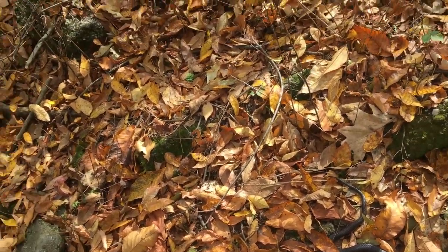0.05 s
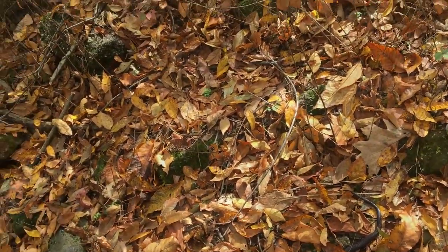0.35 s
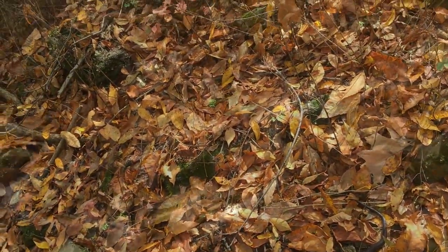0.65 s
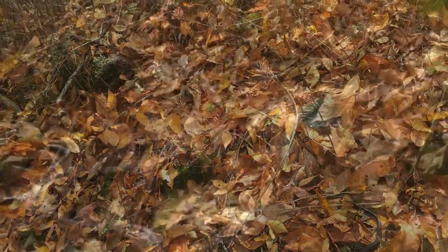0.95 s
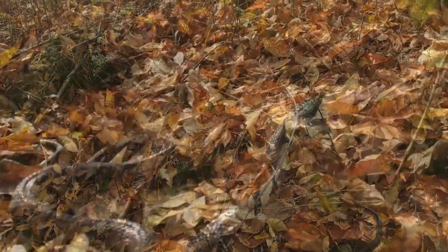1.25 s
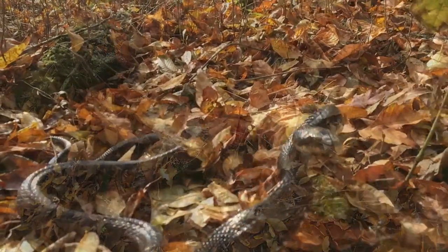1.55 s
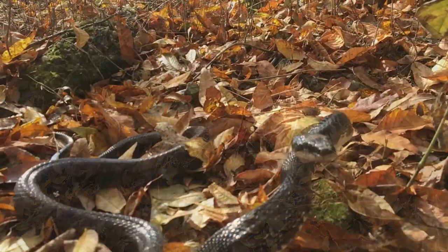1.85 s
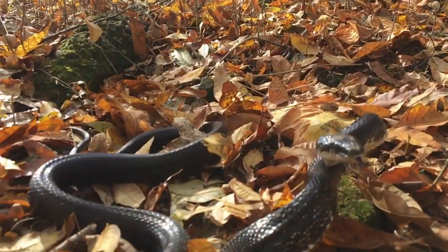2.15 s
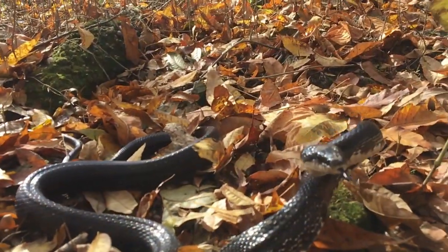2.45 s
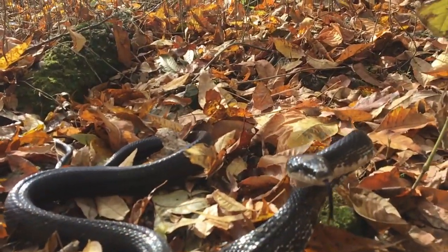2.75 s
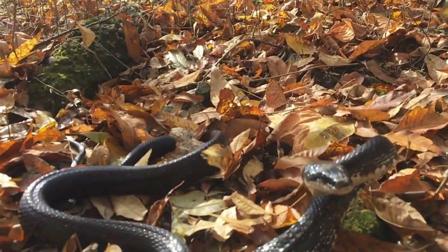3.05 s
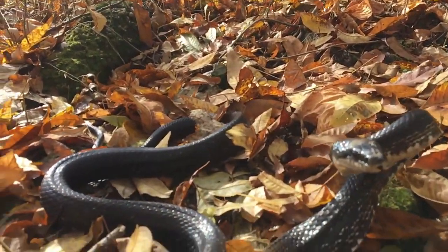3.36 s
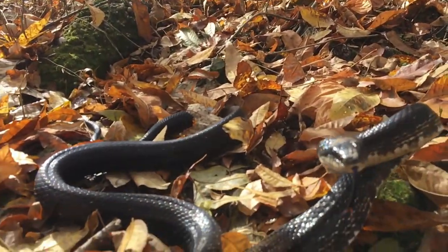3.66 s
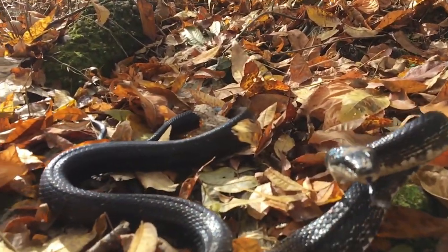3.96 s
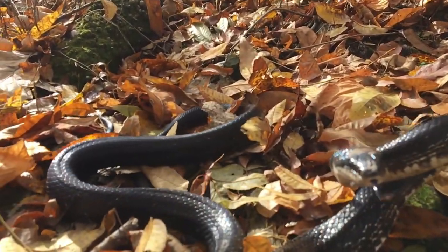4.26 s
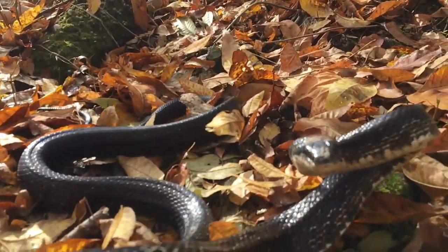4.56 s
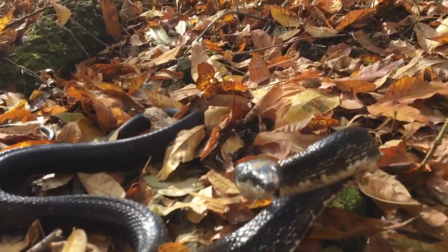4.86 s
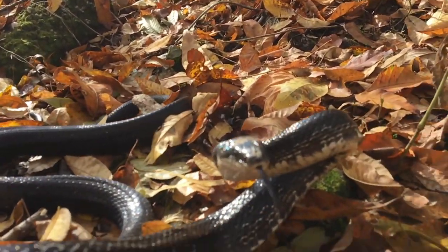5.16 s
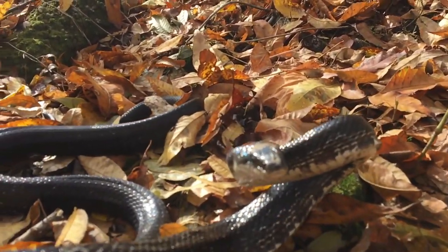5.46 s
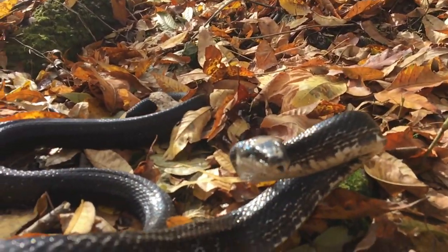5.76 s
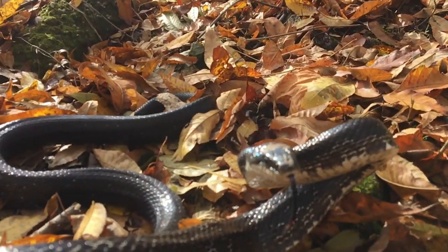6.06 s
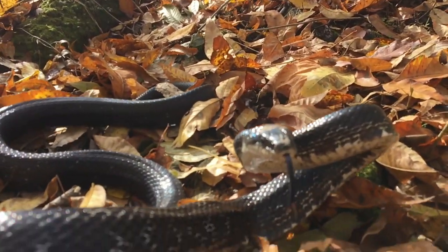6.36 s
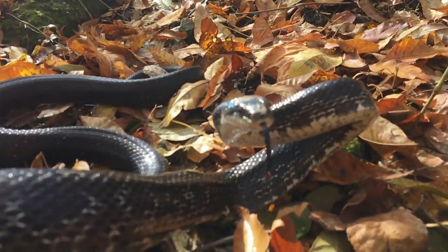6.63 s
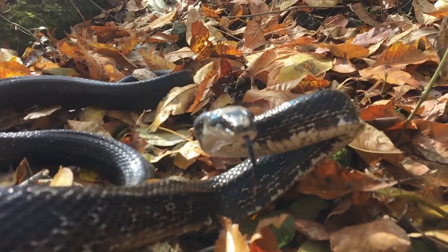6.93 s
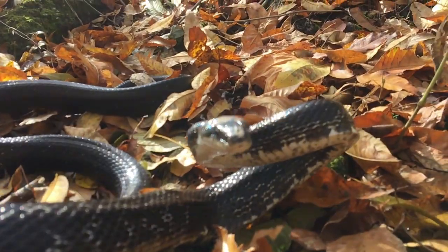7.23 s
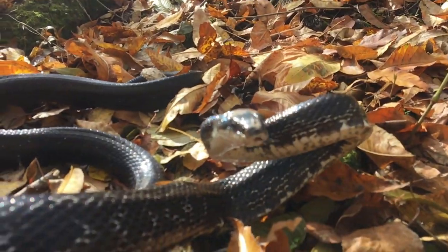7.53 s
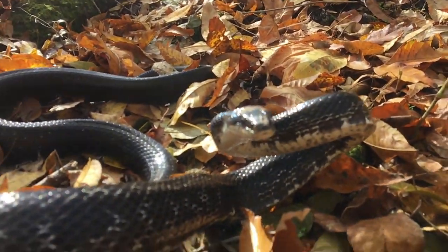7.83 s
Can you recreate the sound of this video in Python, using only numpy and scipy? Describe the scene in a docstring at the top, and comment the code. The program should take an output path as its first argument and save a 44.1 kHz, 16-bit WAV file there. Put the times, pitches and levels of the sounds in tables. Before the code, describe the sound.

Light crackling of dry leaves under a moving snake, followed by a fast, papery tail rattle in a quiet forest.

```python
"""A snake in dry leaf litter

A black snake slides through dry leaves, which tick by stick-slip friction, snap and scuff under it.
It shakes its tail against them in bouts of about 70 strokes a second; each impulse rings a leaf.
Two bumps and a faint knock excite the damped modes of the camera body.
Behind it are the hush of the forest and a low, far drone like that of an engine."""
import sys
import numpy as np
from scipy import signal
from scipy.fft import rfft, irfft, next_fast_len
from scipy.io import wavfile
from scipy.ndimage import map_coordinates

SR = 44100
rng = np.random.default_rng(int(sys.argv[2]) if len(sys.argv) > 2 else 0)


def master_out(mix):
    """Clip the mix to full scale and print it as 16-bit PCM to the path in sys.argv[1]."""
    frames = np.transpose(np.atleast_2d(mix))
    ceiling = np.clip(frames, -1, 1)
    pcm = np.round(ceiling * 32767).astype(np.int16)
    wavfile.write(sys.argv[1], SR, pcm)


N = 347949

# Spectra of the hush before and after it changes: frequency_hz, gain_db
EARLY_HUSH = [(150, -14), (250, 1), (330, -1.5), (436, -6.5), (597, -7.5), (1220, -10.5), (3840, -12.5),
              (4190, -12.5), (9330, -20.5), (16000, -32)]
LATE_HUSH = [(150, -42), (250, -4), (386, -6.5), (493, -12.5), (607, -10.5), (698, -13), (988, -12.5),
             (2620, -15), (4410, -15.5), (4990, -17.5), (9170, -21), (14400, -27), (16000, -39)]
# Swell and ebb of the far drone: time_s, rumble_db, hum_db
DRONE_LEVELS = [(0, -48.5, -71), (1.2, -51, -54), (2.4, -45.5, -43), (3.7, -46.5, -52), (5, -46, -52),
                (5.8, -46.5, -54), (6.9, -45.5, -49), (7.89, -45.5, -44)]
# Spectrum of its rumble: frequency_hz, gain_db
RUMBLE_SPECTRUM = [(20, -30), (31, -10), (42, -4), (63, 2), (80, -1), (100, -3.5), (130, -8), (200, -15.5),
                   (350, -25.5), (500, -35.5), (900, -50)]
# Loudness of the body sliding over leaves: time_s, level_db
SLIDE_LEVELS = [(0, -71.5), (1.3, -68), (1.4, -61.5), (1.7, -68.5), (2.15, -59), (2.8, -64.5), (3.7, -61),
                (4.4, -54), (4.6, -65), (5.1, -56.5), (5.6, -57), (5.95, -71), (6.45, -62), (6.93, -57.5),
                (7.3, -69), (7.89, -65)]
# Spectrum of the leaves under the body: frequency_hz, gain_db
RUSTLE_SPECTRUM = [(450, -33.5), (900, -3.5), (2000, -7.5), (3500, -2.5), (5000, -6), (6200, -3.5),
                   (7500, -5.5), (8800, -1.5), (10500, -9), (12000, -5), (14500, -19), (16000, -25)]
# Single leaves snapping: start_s, strength_db, pitch_hz, crack_trim_db
LEAF_SNAPS = [(1.005, -38, 5280, -27), (1.421, -37, 9000, -19), (1.7078, -33, 7700, -30),
              (1.8447, -39.5, 3250, -14), (2.36, -39.5, 2600, -23), (2.5686, -37, 6160, -21),
              (2.6655, -37, 6670, -26), (2.825, -36, 11400, -27), (3.3202, -35, 9080, -18.5),
              (3.6353, -33.5, 9950, -29), (3.8485, -29.5, 7100, -28), (4.0356, -34.5, 7060, -15),
              (4.819, -33, 3760, -19), (4.9916, -33.5, 6260, -32), (5.1006, -27.5, 6000, -24),
              (5.1157, -31, 3200, -17), (5.7306, -31, 11600, -12), (5.883, -32, 8700, -27),
              (6.1885, -29.5, 11200, -23), (6.32, -31.5, 7300, -28), (6.329, -30, 7350, -32),
              (6.567, -31.5, 11800, -29), (6.726, -39, 11500, -24), (6.8658, -39, 8290, -13),
              (6.9566, -32, 6960, -21), (6.993, -33.5, 4400, -18), (7.1446, -25, 4860, -21.5),
              (7.3912, -32.5, 6960, -20)]
# A leaf skidding on its neighbours: centre_s, half_length_s, level_db, pitch_hz
LEAF_SCUFFS = [(1.38, 0.013, -60, 7500), (2.162, .018, -55.5, 5600), (2.244, 0.036, -52.5, 5340),
               (3.224, .008, -52, 9900), (3.637, 0.0031, -48, 2530), (4.887, 0.0088, -50, 3780),
               (6.328, .006, -49, 7560), (6.943, 0.024, -55.5, 6200), (7.087, 0.0074, -52, 6240)]
# Soft knocks on the camera and the band each excites: start_s, peak_db, bottom_hz, top_hz
CAMERA_BUMPS = [(2.1994, -28.5, 310, 547), (4.0357, -41.5, 260, 1000), (7.8363, -30.5, 126, 1900)]
# Modes of the camera body: frequency_hz, gain_db, t60_s
CAMERA_MODES = [(230, -1, 0.047), (358, -3, 0.032), (560, 3, 0.019), (786, 2.5, 0.015), (1080, -2, 0.01),
                (1710, -6, 0.016)]
# Bouts of tail shaking: start_s, attack_s, hold_s, release_s, level_db, swell_db_per_s, strokes_per_s
TAIL_BOUTS = [(4.149, .04, 0.28, 0.24, -51.5, 10, 74.5), (4.705, .02, .025, .1, -56.5, 0, 70),
              (4.792, .022, 0.862, 0.1, -52, 11.5, 75.9), (5.808, .012, 0.087, 0.037, -52, 5, 66)]
# Spectra of a litter leaf and of a thin, curled, crisp one: frequency_hz, gain_db
LITTER_LEAF = [(400, -48), (800, -9.5), (1500, -18), (2300, -6.5), (2900, -11), (4000, 0), (4900, 0.5),
               (5800, 3.5), (7200, -3.5), (8300, 3), (9600, -2.5), (10500, -2.5), (12000, -12),
               (16000, -12)]
CRISP_LEAF = [(500, -36), (950, -30), (1650, -12), (3000, -29), (4400, -11.5), (5000, -9), (5900, -6),
              (7400, -10), (8700, -0.5), (9500, 0.5), (10400, -6.5), (11100, -8.5), (13200, -16),
              (16000, -36)]
# Blows of the tail that land on the crisp leaf: time_s, share_0_to_1
CRISP_SHARE = [(4.55, 0), (5, .42), (5.3, 0.93), (5.64, 0.93), (5.9, 0.54)]
# The slap sharpens as the tip reaches for the crisp leaf: time_s, slap_to_scrape_db
SLAP_BALANCE = [(4.55, -16), (5.16, 0), (5.29, -2), (5.33, -12), (5.64, -13), (5.9, -6)]
# Response of the microphone port: frequency_hz, gain_db
PORT_RESPONSE = [(2400, 0), (2950, -2), (4200, -0.5), (5000, -2), (5800, 0.5), (7300, 0), (8700, -1),
                 (9700, 0.5), (10400, -2.5), (11200, 0)]


def amp(db):
    """Amplitude ratio of a level in decibels."""
    return 10 ** (np.asarray(db) / 20)


def unit(x):
    """Normalisation to rms 1."""
    return x / np.sqrt(np.mean(x ** 2) + 1e-20)


def along(points, hz):
    """Interpolation of a spectrum on a logarithmic frequency axis."""
    knots_hz, values = np.transpose(points)
    return np.interp(np.log(hz + 1), np.log(knots_hz + 1), values)


def curves(rows):
    """Linear interpolation in time: one value per sample for each later column."""
    times, *columns = np.transpose(rows)
    return [np.interp(np.arange(N) / SR, times, column) for column in columns]


def wobble(knots_per_s):
    """Smooth random modulation: a spline through Gaussian values."""
    knots = rng.standard_normal(int(N * knots_per_s / SR) + 4)
    return map_coordinates(knots, [np.arange(N) * knots_per_s / SR])


def filtered(x, response):
    """Linear filtering: the spectrum of x times a frequency response."""
    size = next_fast_len(N + SR // 2)
    return irfft(rfft(x, size) * response(np.fft.rfftfreq(size, 1 / SR)), size)[:N]


def noise(spectrum):
    """Spectral shaping of white noise; rms 1."""
    return unit(filtered(rng.standard_normal(N), lambda hz: amp(along(spectrum, hz))))


def forest(change_s=1.19, fade_s=0.04, recovery_s=0.52):
    """Broadband hush: at 1.19 s one hush gives way to another in a quick equal-power crossfade, and the later
    one dips and then rises back."""
    t = np.arange(N) / SR
    late_share = np.clip((t - change_s) / fade_s + .5, 0, 1)
    early = amp(-53.5 - 3.5 * t) * noise(EARLY_HUSH)
    dip_db = 7 * np.exp(-np.maximum(t - change_s, 0) / recovery_s)
    late = amp(-58.5 - dip_db) * noise(LATE_HUSH)
    return np.sqrt(1 - late_share) * early + np.sqrt(late_share) * late


def far_engine(firing_hz=83.5):
    """Periodic firing gives a wavering hum with a weak second harmonic, amid a random rumble."""
    rumble_db, hum_db = curves(DRONE_LEVELS)
    phase = 2 * np.pi * np.cumsum(firing_hz + 0.6 * wobble(4)) / SR
    hum = np.sqrt(2) * (np.sin(phase) + amp(-25.5) * np.sin(2 * phase))
    return amp(rumble_db) * noise(RUMBLE_SPECTRUM) + amp(hum_db + 0.47 * wobble(4.7)) * hum


def leaf_ring(spectrum, ripple_db, size=512):
    """Minimum-phase impulse response of a leaf: a given spectrum plus random resonances."""
    hz = np.fft.rfftfreq(size, 1 / SR)
    ripple = map_coordinates(rng.standard_normal(size=48), [hz / 500], mode="nearest")
    colour_db = along(spectrum, hz) + ripple_db * ripple
    cepstrum = irfft(np.log(np.maximum(amp(colour_db), 1e-3)))
    cepstrum[1:size // 2] *= 2  # folding the cepstrum makes the ring causal
    cepstrum[size // 2 + 1:] = 0
    ring = irfft(np.exp(rfft(cepstrum)))
    return ring / np.linalg.norm(ring)


def crackle(pressure, spectrum, slips_per_s, scatter_db, ripple_db, leaves=8):
    """Stick-slip friction: random impulses ring leaves at a rate of pressure times slips_per_s."""
    out = np.zeros(N)
    for _ in range(leaves):
        slips = rng.random(N) < pressure * slips_per_s / (leaves * SR)
        direction, strength = rng.standard_normal((2, N))
        sizes = np.sign(direction) * amp(scatter_db * np.minimum(strength, 2))
        out += signal.oaconvolve(slips * sizes, leaf_ring(spectrum, ripple_db))[:N]
    return unit(out)


def body_slide():
    """Sliding friction: scales drag over the litter, which gives way in clumps of ticks."""
    level_db, = curves(SLIDE_LEVELS)
    clumps = unit(amp(3.6 * wobble(60)))
    ticks = crackle(clumps, RUSTLE_SPECTRUM, slips_per_s=420, scatter_db=7, ripple_db=4.5, leaves=16)
    return amp(level_db) * ticks


def faint_snaps(count=18, strength_db=-39.5, pitch_hz=5800, crack_trim_db=-26):
    """Chance fractures, as rows like LEAF_SNAPS; their rate follows the amplitude of the slide."""
    travel = np.cumsum(amp(curves(SLIDE_LEVELS)[0]))
    shares = (np.arange(count) + rng.random(count)) / count
    times = np.searchsorted(travel / travel[-1], shares) / SR
    return [(start_s, strength_db + 2 * louder, pitch_hz * np.exp(0.47 * higher), crack_trim_db)
            for start_s, (louder, higher) in zip(times, rng.standard_normal((count, 2)))]


def leaf_snaps(size=1024):
    """Brittle fracture: a brief run of breaks rings a leaf, and the blade buckles with a low crack."""
    out, t = np.zeros(N + 2 * size), np.arange(size) / SR
    envelope = (1 - np.exp(-t / 0.0013)) * (amp(-60 * t / 0.011) + 0.033 * amp(-60 * t / 0.014))
    crack_spectrum = [(250, -24), (550, -7), (1000, -3), (1500, 0), (2200, 0), (3500, -8), (8000, -26)]
    for start_s, db, hz, crack_trim_db in list(LEAF_SNAPS) + faint_snaps():
        fractures = envelope * rng.standard_normal(size) * amp(6.8 * rng.standard_normal(size))
        spectrum = [(hz / 6, -19), (hz / 2, -8), (hz, 0), (hz * 1.44, -7.5), (hz * 3, -20)]
        snap = np.convolve(fractures, leaf_ring(spectrum, ripple_db=1.1))[:size]
        crack = leaf_ring(crack_spectrum, ripple_db=1, size=size)
        out[round(start_s * SR):][:size] += amp(db - 20) * unit(snap)
        out[round((start_s + .001) * SR):][:size] += amp(db + crack_trim_db - 8.5) * unit(crack)
    return out[:N]


def leaf_scuffs(ticks_per_s=1800):
    """Friction excites a resonance: a skidding leaf edge gives a swell of ticks around one pitch."""
    out, t = np.zeros(N), np.arange(N) / SR
    for centre_s, half_s, db, hz in LEAF_SCUFFS:
        span = np.flatnonzero(np.abs(t - centre_s) < 4 * half_s)
        ticks = rng.standard_normal(len(span)) * (rng.random(len(span)) < ticks_per_s / SR)
        ring = leaf_ring([(hz / 5, -20), (hz * .6, -13), (hz * .85, -1), (hz * 1.15, 0),
                          (hz * 1.5, -10), (hz * 3, -19)], ripple_db=2)
        swell = np.exp(-.5 * ((t[span] - centre_s) / half_s) ** 2)
        out[span] += amp(db) * swell * unit(np.convolve(ticks, ring)[:len(span)])
    return out


def camera_bumps(size=4096):
    """Damped modal vibration: a knock rings the camera body; a firmer contact reaches more modes."""
    out, t = np.zeros(N + size), np.arange(size) / SR
    ring = sum((-1) ** k * amp(db - 60 * t / t60_s) * np.sin(2 * np.pi * hz * t)
               for k, (hz, db, t60_s) in enumerate(CAMERA_MODES))
    for start_s, peak_db, bottom_hz, top_hz in CAMERA_BUMPS:
        band = signal.butter(3, [bottom_hz, top_hz], "bandpass", fs=SR, output="sos")
        thud = signal.sosfilt(band, ring)
        out[round(start_s * SR):][:size] += amp(peak_db) * thud / np.abs(thud).max()
    return out[:N]


def shaking_bouts(tiring_hz_per_s=9.4, release_db=21):
    """Amplitude and phase (in strokes) of the tail's oscillation, which slows as each bout goes on."""
    t = np.arange(N) / SR
    gain, strokes = np.zeros(N), np.zeros(N)
    for start_s, attack_s, hold_s, release_s, db, swell_db_per_s, strokes_per_s in TAIL_BOUTS:
        age = t - start_s
        rise = .5 + .5 * np.tanh(age / attack_s)
        swell_db = swell_db_per_s * np.clip(age, 0, hold_s)
        fall_db = release_db * np.maximum(age - hold_s, 0) / release_s
        bout = rise * amp(db + swell_db - fall_db)
        strokes = np.where(bout > gain, strokes_per_s * age - tiring_hz_per_s * age ** 2 / 2, strokes)
        gain = np.maximum(gain, bout)
    return gain, strokes


def tail_rattle():
    """Friction and impact: the tip scrapes leaves at both ends of its swing and slaps at one end."""
    gain, strokes = shaking_bouts()
    shaking = gain > amp(-85)
    crisp = np.clip(curves(CRISP_SHARE)[0], 0, 1)
    slap_ratio = amp(curves(SLAP_BALANCE)[0])
    phase = strokes + .025 * wobble(60)  # no two strokes land quite alike
    stroke = np.round(phase)
    width = np.where(stroke % 2, .18, .15)  # spread of the contact as a share of the stroke
    contact = np.exp(-.5 * ((phase - stroke) / width) ** 2) / np.sqrt(width)
    grip = contact * amp(3.1 * np.tanh(wobble(600)))  # the tip catches and lets go within a stroke
    pressure = .35 * grip + 0.069
    pulse = np.sqrt(pressure)
    dull = pulse * crackle(pressure + 0.28, LITTER_LEAF, slips_per_s=4600, scatter_db=2, ripple_db=3.5)
    bright = pulse * crackle(pressure, CRISP_LEAF, slips_per_s=2500, scatter_db=9.5, ripple_db=1)
    odd_stroke_lands = np.diff(np.floor(phase / 2 + .5)) > 0
    slaps = np.zeros(N)
    for start in np.flatnonzero(shaking[1:] & odd_stroke_lands):
        ring = leaf_ring(CRISP_LEAF if rng.random() < crisp[start] else LITTER_LEAF, ripple_db=6.5)
        slaps[start:start + len(ring)] += amp(rng.normal(0, 1.8)) * ring
    dull, bright, slaps = (shaking * x / x[shaking].std() for x in (dull, bright, slaps))
    scrape = np.sqrt(1 - crisp) * dull + np.sqrt(crisp) * bright
    return gain * (scrape + slap_ratio * slaps) / np.sqrt(1 + slap_ratio ** 2)


def scene():
    """Superposition in one channel: the snake close by, the forest behind."""
    background = forest() + far_engine()
    return (background + body_slide() + camera_bumps() + leaf_snaps() + leaf_scuffs() + tail_rattle())[None]


def record(dry, limit_hz=16000):
    """Frequency response: the microphone port colours the treble, and the camera limits the band."""
    return filtered(dry[0], lambda hz: amp(along(PORT_RESPONSE, hz)) * (hz < limit_hz))[None]


dry = scene()
out = record(dry)
master_out(out)
```